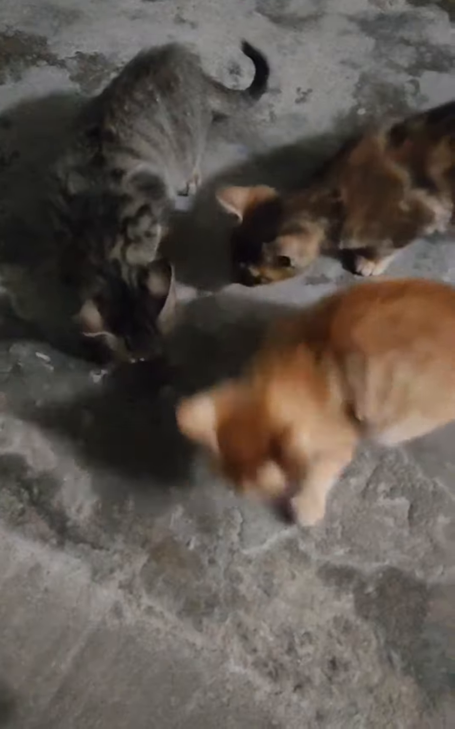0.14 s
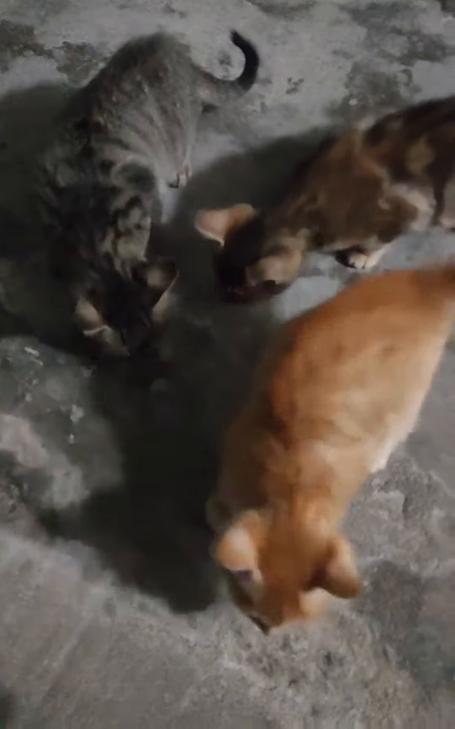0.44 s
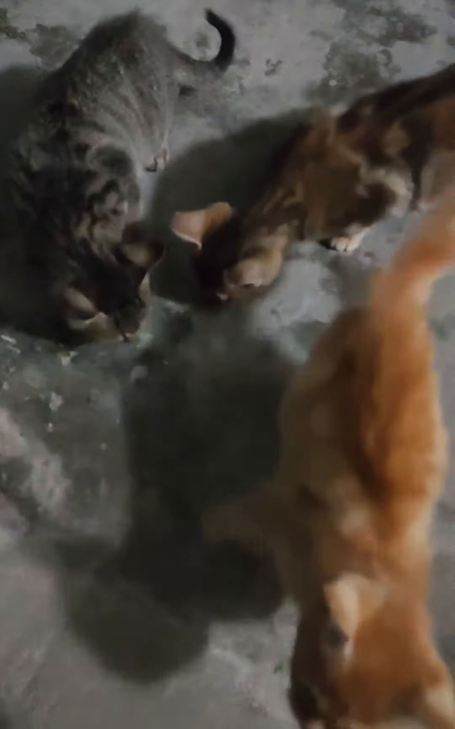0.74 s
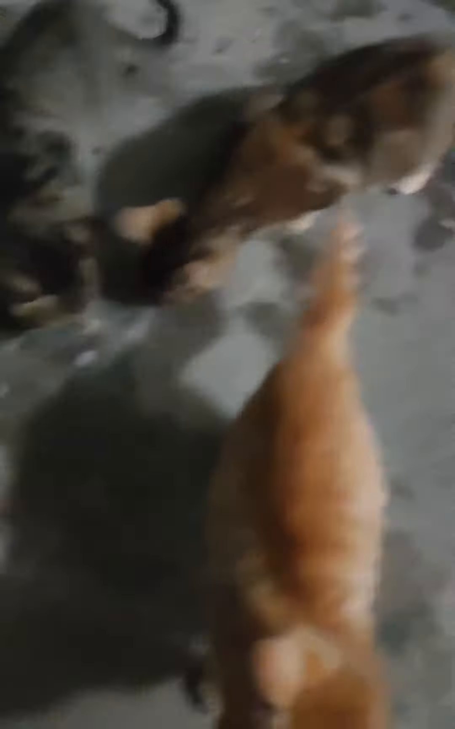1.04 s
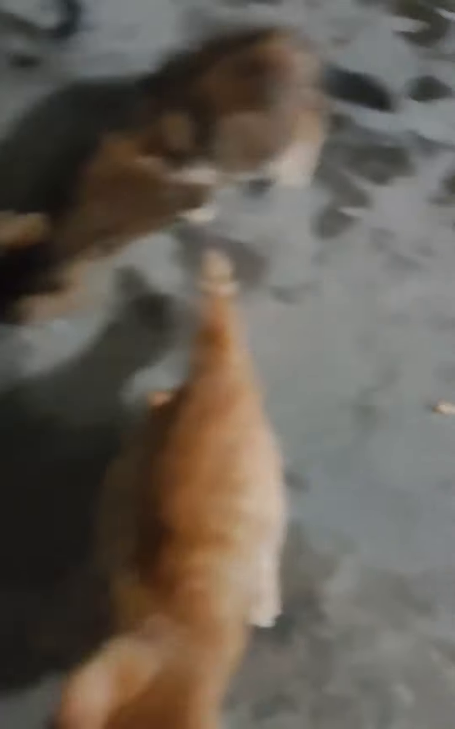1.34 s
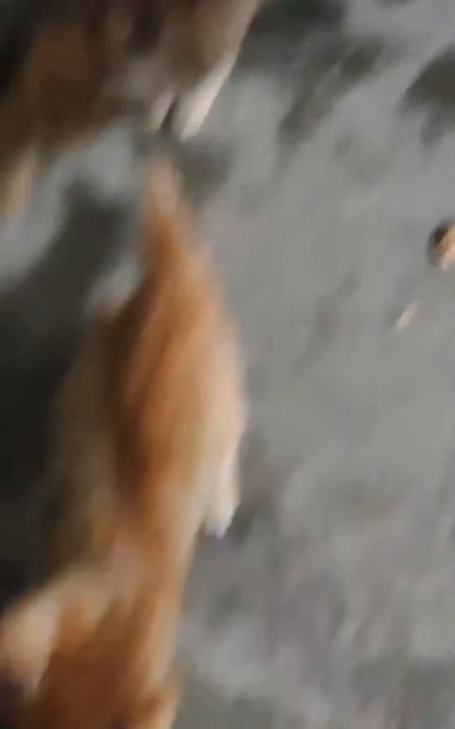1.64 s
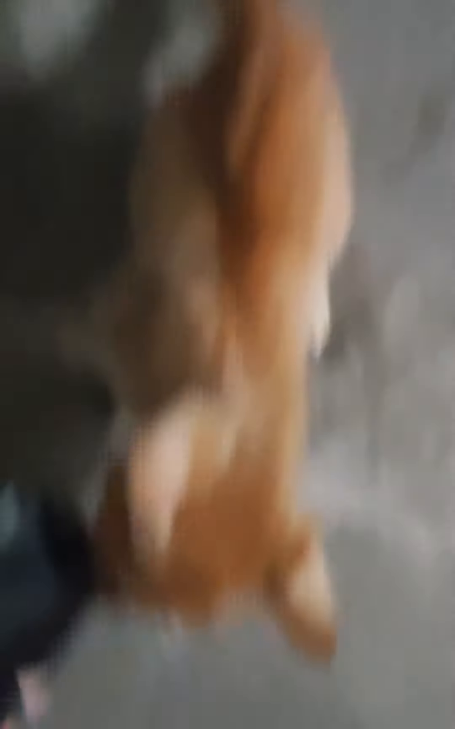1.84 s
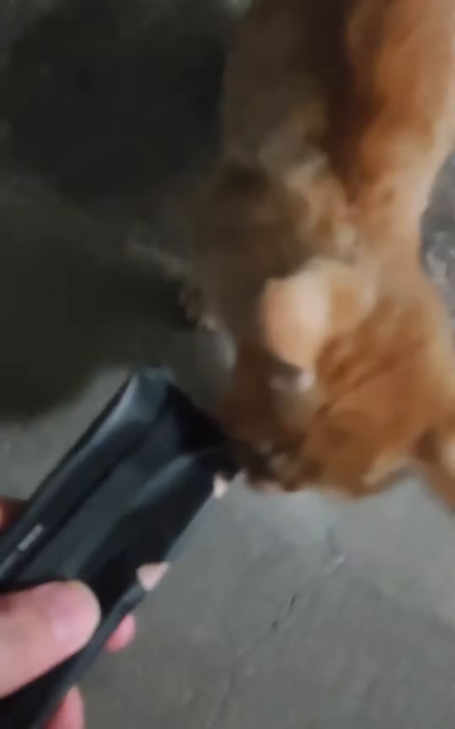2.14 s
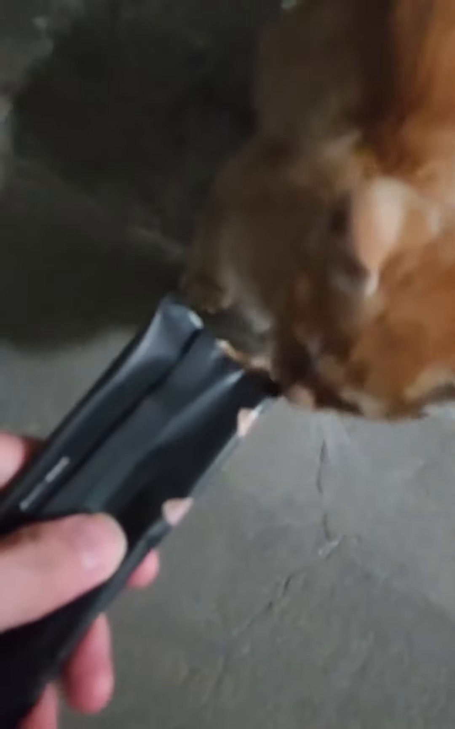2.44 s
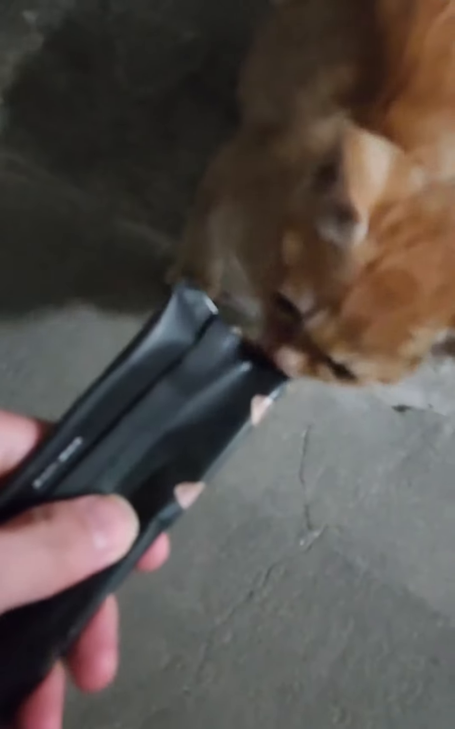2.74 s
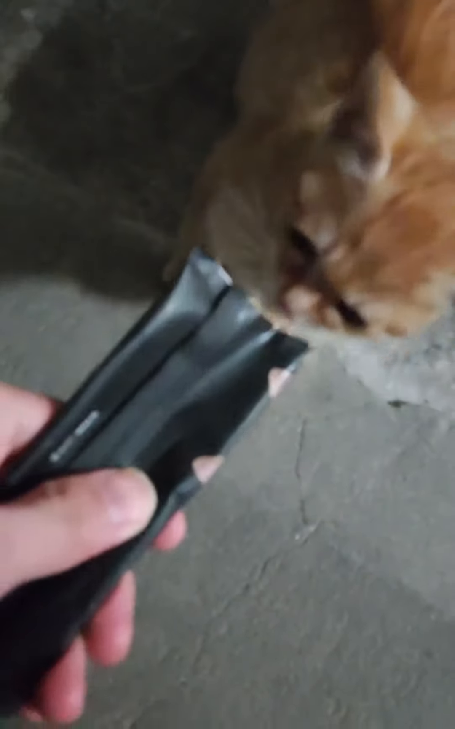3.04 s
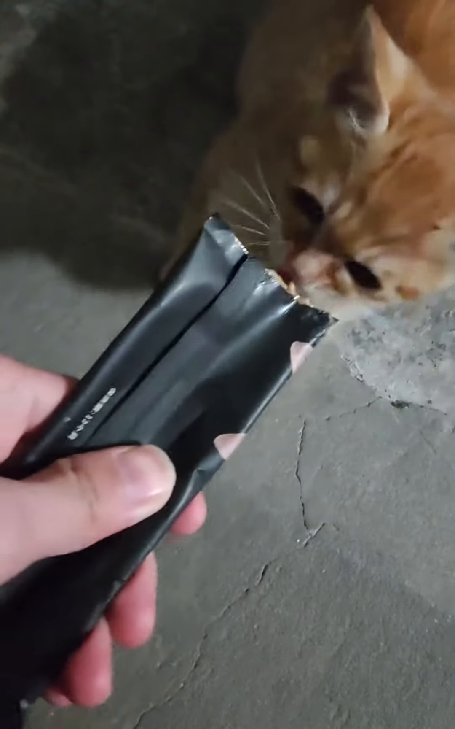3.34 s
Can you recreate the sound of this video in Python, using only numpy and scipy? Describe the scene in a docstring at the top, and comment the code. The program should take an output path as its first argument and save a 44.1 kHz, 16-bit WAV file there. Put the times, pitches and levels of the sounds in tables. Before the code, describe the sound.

A cat growls over food, a falling yowl turning rough, then a second low growl

```python
"""Cat growling over food

A cat guards its food on a concrete yard, close to a hand-held microphone: a clear yowl sinks into a growl
while its jaw chews, and after a pause comes a second, rough growl. The voice is a sum of harmonics with
pulsed air noise; a plastic pouch ticks and rustles in short noise bursts. Low noise and damped swings make
the rumble of the moving microphone, over a quiet night of coloured noise."""
import sys
import numpy as np
from scipy import signal
from scipy.fft import rfft, irfft
from scipy.io import wavfile
from scipy.ndimage import uniform_filter1d

SR = 44100
rng = np.random.default_rng(int(sys.argv[2]) if len(sys.argv) > 2 else 0)


def master(y):
    """Save y as 16-bit WAV."""
    cut = np.clip(np.atleast_2d(y).T, -1, 1)
    pcm = np.round(cut * 32767)  # scale
    wavfile.write(sys.argv[1], SR, pcm.astype(np.int16))


N = 154350
T = np.arange(N) / SR


def undb(db):
    """Decibels to gain."""
    return 10 ** (np.asarray(db) / 20)


def unit(x):
    """Scale to rms 1."""
    return x / np.sqrt(np.mean(x ** 2))


def curves(rows):
    """Each column of a table after the first, joined by straight lines in time."""
    rows = np.array(rows, float).T
    return [np.interp(T, rows[0], column) for column in rows[1:]]


def db_at(points, hz):
    """Read a spectrum on a log-frequency axis."""
    f, db = np.array(points, float).T
    return np.interp(np.log(hz + 1), np.log(f), db)


def colour(x, points, share=1):
    """Filter by a spectrum of (f/Hz, level/dB) points, its dB scaled by share."""
    db = share * db_at(points, np.fft.rfftfreq(N, 1 / SR))
    return irfft(rfft(x) * undb(db), N)


def noise(points):
    """Coloured noise of rms 1."""
    return unit(colour(rng.standard_normal(N), points))


def walk(rate):
    """Smooth random drift of rms 1, with `rate` new values per second."""
    step = int(SR / rate)
    held = np.repeat(rng.standard_normal(N // step + 1), step)
    return unit(uniform_filter1d(held, step)[:N])


def pan(x, db):
    """Place a sound by its left-minus-right level in dB."""
    return x * undb(np.array([[db], [-db]]) / 2)


# chews, each opening the mouth: t/s, half length/s, opening (0-1)
CHEW_TIMES = [(0.138,0.039,0.73),(0.357,0.057,0.81),(0.61,0.073,0.67),(0.884,0.035,0.7),(1.112,0.042,0.77),(2.266,0.027,0.5),(2.531,0.027,0.42),(2.778,0.031,0.35),(3.08,0.031,0.24),(3.401,0.064,0.35)]
# what a fully open mouth adds: f/Hz, level/dB
OPEN_MOUTH = [(330,2),(660,-7),(950,14),(1280,8),(1620,22),(2000,19),(2500,20),(3200,23),(4500,0)]
# colour of the air that rasps in the voice: f/Hz, level/dB
RASP_COLOUR = [(100,-15),(170,-16),(270,2),(340,3),(450,-9),(580,1.5),(750,-9.5),(950,-8.5),(1250,-19),(1750,-37),(2200,-23),(2800,-41),(4000,-36)]
# colour of the air past the open mouth: f/Hz, level/dB
MOUTH_AIR_COLOUR = [(700,-14),(1300,-7),(1700,1),(2150,-6),(2700,-11),(3300,2),(4200,-7),(8000,-27)]
MOUTH_AIR_DB = -16  # against the tone, at full roughness and opening, before the final mix scaling
WAVER, WANDER = 0.00497, .025  # rms swing of pitch (share): always, and extra per unit of roughness
TREMBLE_DB = 3  # rms swing of each harmonic
THROB_FROM = .16  # roughness above which the pulses fall into repeating groups


def voice(hz, db, rough, lift, throat, jitter, shimmer, rasp, throb, count):
    """Vocal-fold pulses and pulsed air pass the throat and the chewing mouth; when rough, pulses repeat
    in groups of `count`, which adds lines between the harmonics."""
    mouth = sum(size * np.exp(-np.abs((T - at) / half) ** 3) for at, half, size in CHEW_TIMES)
    swing = WAVER * walk(60) + WANDER * rough * walk(70)
    cycles = np.cumsum(hz * (1 + swing)) / SR
    # one random timing and one random size per cycle
    early, size = (np.interp(cycles, np.arange(1000), row) for row in rng.standard_normal((2, 1000)))
    phase = 2 * np.pi * (cycles + jitter * rough * early)

    folds = 0
    for k in np.arange(1, 17):
        gain = undb(mouth * db_at(OPEN_MOUTH, k * hz) + lift * (k == 1) + TREMBLE_DB * walk(30))
        folds = folds + gain * np.cos(k * phase + np.sqrt(k) * np.pi)

    split = throb * np.sqrt(np.maximum(rough - THROB_FROM, 0))
    between = [n / count for n in range(count + 1, 7 * count) if n % count]
    for k in between:
        gain = split * undb(mouth * db_at(OPEN_MOUTH, k * hz))
        drift = 2 * np.pi * rng.random() + .8 * walk(14)
        folds = folds + gain * np.cos(k * phase + drift)

    tone = colour(folds * (1 + shimmer * rough * size), throat)
    tone = tone / np.sqrt(uniform_filter1d(tone ** 2, size=1100) + 1e-12)  # even level over 25 ms
    air = noise(RASP_COLOUR)
    air = (air + mouth * (colour(air, OPEN_MOUTH) - air)) * rasp * rough
    air = air + undb(MOUTH_AIR_DB) * mouth * rough * noise(MOUTH_AIR_COLOUR)
    pulsed_air = air * (1 + .6 * np.cos(phase))
    return undb(db) * (tone + pulsed_air) / np.sqrt(1 + (rasp * rough) ** 2)


# the cat moves round the microphone, lead of the left port: t/s, lead/ms
LEFT_LEAD = [(0,0.088),(.75,0.068),(1.05,0.17),(2.3,0.52),(3.5,0.5)]
YARD_T60_S, YARD_DB = 1, -11  # decay rate of the scatter (cut off at 0.5 s) and its level


def yard(x, side):
    """The voice reaches the two ports, followed by a short scatter from ground and walls."""
    left, right = colour(x, side, 1 / 2), colour(x, side, -1 / 2)
    ahead = np.interp(T + curves(LEFT_LEAD)[0] / 1000, T, left)
    direct = np.array([ahead, right])
    tail = rng.standard_normal((2, SR // 2)) * undb(-60 * T[:SR // 2] / YARD_T60_S)
    tail /= np.sqrt(np.sum(tail ** 2, axis=1, keepdims=True))
    return direct + undb(YARD_DB) * signal.fftconvolve(direct, tail, axes=1)[:, :N]


# melody of the yowl: t/s, f/Hz, level/dB
YOWL_LINE = [(0,335.4,-42.5),(.055,397.3,-46),(.085,391.1,-43.5),(.125,348.4,-46.5),(.2,350.2,-42.5),(.235,336.7,-42.5),(.275,351.3,-40.5),(.345,316.1,-43),(.44,337.1,-40),(.52,329.9,-41.5),(.55,305.1,-44.5),(.62,291,-42),(.72,277.4,-41.5),(.78,286.8,-41),(.83,245.9,-43.5),(.88,196.6,-44),(.94,179.3,-46),(1.04,197.2,-48),(1.105,158.7,-48),(1.2,168.2,-49),(1.235,167.6,-62),(1.3,165,-79)]
# its hoarseness: t/s, roughness (0 = clear)
YOWL_HOARSE = [(0,0.17),(.78,0.11),(.87,0.22),(.95,0.47),(1.04,0.31),(1.12,0.33),(1.22,0.87)]
# throat behind the nearly shut mouth: f/Hz, level/dB
YOWL_TRACT = [(100,-33),(185,2.5),(250,5.5),(330,2),(450,-9),(560,1),(680,3.5),(830,-5),(1000,-7.5),(1170,-21.5),(1600,-27),(2400,-40.5),(4000,-39)]
# low resonance the throat gains as the yowl sinks into a growl: f/Hz, level/dB
CHEST_TONE = [(200,-8),(290,7),(370,5),(470,3),(600,-10),(1200,-40)]
# stereo colour of the yowl: f/Hz, left-minus-right level/dB
YOWL_STEREO = [(200,0.5),(340,-4.5),(600,3.5),(1000,5),(1600,-3.5),(3000,-1.5)]


def yowl():
    """A clear falling cry that brightens with each chew and gains a chest resonance as its pitch sinks."""
    hz, db = curves(YOWL_LINE)
    rough = curves(YOWL_HOARSE)[0]
    cry = voice(hz, db, rough, 0, YOWL_TRACT, jitter=.07, shimmer=.65, rasp=.5, throb=.85, count=2)
    sunk = np.clip((250 - hz) / 50, 0, 1)  # 0 above 250 Hz, 1 below 200 Hz
    cry = cry + sunk * (colour(cry, CHEST_TONE) - cry / 4) / 2
    return yard(cry * (T < YOWL_LINE[-1][0]), YOWL_STEREO)


# the growl: t/s, f/Hz, level/dB, roughness (0 = clear), lift of the fundamental/dB
GROWL_LINE = [(2.17,165.4,-79,0.77,0),(2.24,169.7,-50.5,0.56,13.5),(2.34,170.7,-44.5,1.11,-9.5),(2.44,164.9,-44.5,0.88,2),(2.52,176.7,-45.5,0.55,-4.5),(2.6,176.1,-41,0.88,-2.5),(2.66,155.8,-44,0.58,-5),(2.74,170.3,-44,0.88,-2),(2.8,176.1,-42,0.44,3),(2.85,177.4,-40,0.38,-2),(2.9,175.2,-44.5,0.67,-7),(3.02,171.3,-44,.55,5),(3.13,183.8,-40,0.6,4),(3.19,178.8,-42.5,0.71,0),(3.225,170.2,-41,0.25,-1),(3.275,182.2,-43.5,0.42,1),(3.31,179,-39,0.19,-1),(3.37,171.9,-41,0.26,3.5),(3.455,169,-40.5,0.13,10.5),(3.485,172,-58,0.4,-1)]
# throat behind the nearly shut mouth: f/Hz, level/dB
GROWL_TRACT = [(110,-27),(170,1.5),(250,9),(350,5),(450,-2),(520,-7.5),(600,7),(720,-2.5),(800,1),(900,-9),(1030,-14.5),(1250,-20.5),(1700,-54),(2200,-51),(2800,-65)]
# stereo colour of the growl: f/Hz, left-minus-right level/dB
GROWL_STEREO = [(170,-0.5),(350,-7),(540,14),(720,-10),(950,12),(1400,-3.5),(2200,1)]


def growl():
    """A growl through a nearly shut mouth: roughness jitters and splits the pulses, less so at the end."""
    hz, db, rough, lift = curves(GROWL_LINE)
    cry = voice(hz, db, rough, lift, GROWL_TRACT, jitter=.05, shimmer=.35, rasp=.35, throb=.64, count=3)
    return yard(cry * (T > GROWL_LINE[0][0]), GROWL_STEREO)


# ticks of the pouch and teeth: t/s, level/dB, f/Hz, left-minus-right level/dB, decay/s, width/octaves
TICK_LIST = [(.589,-52,8950,-2,0.0044,0.86),(1.792,-51.5,6100,-6,0.0056,0.72),(1.848,-55.5,5430,-8,.004,.8),(1.922,-53,2500,-8,.004,.5),(1.9928,-46.5,2700,-7,0.002,1),(2.0145,-38,2080,-2,0.0013,0.66),(2.0398,-46.5,5700,2,0.0091,0.21),(2.041,-50,3000,-1,0.0095,0.74),(2.1102,-48,3240,0,.0024,0.27),(2.2257,-51.5,3400,-7,0.0032,0.3),(2.2485,-55.5,3720,-2,0.032,0.11),(2.281,-48.5,4200,4,.002,0.79),(2.599,-54.5,6220,-3,0.011,0.16),(2.736,-46,3890,0,0.003,0.88),(2.787,-48.5,4760,-2,.003,0.6),(2.846,-52,3650,0,0.0036,0.22),(2.8785,-41,6560,9,0.0017,0.16),(2.9327,-49,14000,0,.0008,.3),(3.212,-49,9300,9,0.0024,.2),(3.251,-51,7980,9,.002,0.45),(3.3482,-52,2300,1,0.014,0.2),(3.416,-44.5,9900,2,.0014,0.96),(3.44,-51.5,4200,-4,0.0039,.22)]
TICK_BODY_DB, TICK_ATTACK_S = -16, 0.0003  # broad noise under each tick's band, and its onset
CRINKLE_PER_S, CRINKLE_DB = 14, -78  # average rate and overall level of the faint crinkles


def pouch():
    """Plastic creases snap as short band-shaped noise bursts, with faint random crinkles throughout."""
    out, count = np.zeros((2, N)), 4096
    f, age = np.fft.rfftfreq(count, 1 / SR) + 1, T[:count]
    for at, db, hz, side, decay, width in TICK_LIST:
        band = np.exp(-.5 * (np.log2(f / hz) / width) ** 2)
        body = undb(TICK_BODY_DB) * f / (f + 1000) / (1 + f / 9000)
        shared, *own = irfft(rfft(rng.standard_normal((3, count))) * (band + body))
        envelope = (1 - np.exp(-age / TICK_ATTACK_S)) * np.exp(-age / decay)
        burst = unit(shared + 2.1 * np.array(own)) * envelope * undb(db) / 2
        start = int(at * SR)
        out[:, start:start + count] += pan(burst, side)[:, :N - start]
    snaps = (rng.random(N) < CRINKLE_PER_S / SR) * rng.random(N)
    ring = rng.standard_normal((2, count)) * np.exp(-age / 0.0072)
    crinkles = signal.fftconvolve(snaps[None], ring, axes=1)[:, :N]
    return out + undb(CRINKLE_DB) * unit(colour(crinkles, HISS_COLOUR))


# microphone rumble before panning: t/s, level/dB
RUMBLE_LINE = [(0,-40),(.2,-39.5),(.35,-40),(.62,-39.5),(.85,-42),(1.18,-47.5),(1.3,-49.5),(1.6,-66),(1.8,-47),(1.87,-53),(2.0,-48.5),(2.15,-52),(2.3,-64),(2.47,-56),(2.56,-47),(2.66,-63),(3.0,-63),(3.39,-70),(3.44,-54),(3.5,-58)]
# its colour: f/Hz, level/dB
RUMBLE_COLOUR = [(15,-3.5),(45,3),(110,-1),(160,-3),(230,-17.5),(310,-20.5),(400,-27.5),(900,-56.5)]
# soft bumps of handling and steps: t/s, level/dB, f/Hz, left-minus-right level/dB
BUMP_LIST = [(0.11,-46,154,18),(0.178,-28,50.3,7),(0.218,-32,147,15),(0.421,-31.5,121,17),(.587,-33.5,105,-26.5),(0.616,-40.5,144,-29),(0.736,-39.5,95.7,31.5),(0.842,-41,89.62,19),(1.172,-42.5,38.9,32),(1.321,-43.5,128,-7),(1.675,-47,69,-22),(1.776,-43,79,-25.5),(1.817,-39,120,-19.5),(1.906,-41.5,73.6,10),(1.937,-44.5,86,26.5),(2.035,-42.5,65,30.5)]
BUMP_S = 0.0036  # time for a bump's envelope to peak


def handling():
    """Air and the hand rumble on each port as low noise; bumps push a heavily damped swing."""
    level = undb(curves(RUMBLE_LINE)[0] + 2 * walk(21.12))
    out = pan(np.array([noise(RUMBLE_COLOUR), noise(RUMBLE_COLOUR)]) * level, 4.6)
    for at, db, hz, side in BUMP_LIST:
        age = np.maximum(T - at, 0)
        envelope = age / BUMP_S * np.exp(1 - age / BUMP_S)
        out = out + pan(undb(db) * envelope * np.sin(2 * np.pi * hz * age), side)
    return out


# colour of the night background: f/Hz, level/dB per Hz
NIGHT_COLOUR = [(30,6.5),(160,4),(300,-0.5),(450,-12.5),(900,-24.5),(1300,-41.5),(2100,-25.5),(2800,-32),(4500,-28.5),(6300,-31.5),(7400,-35),(16000,-37.5)]
# colour of the fine hiss, also of the crinkles: f/Hz, level/dB per Hz
HISS_COLOUR = [(800,15.5),(2200,10),(3500,4),(5000,1.5),(6400,6.5),(7600,-12.5),(10000,-7.5),(15000,-2)]
# fine hiss, before its stereo spread is added: t/s, level/dB
HISS_LINE = [(0,-75),(.35,-63.5),(1.25,-60.5),(1.55,-69.5),(1.85,-66.5),(2.15,-69.5),(2.5,-64),(2.8,-67),(3.0,-67.5),(3.5,-67.5)]
# colour of the topmost hiss: f/Hz, level/dB
TOP_HISS_COLOUR = [(6000,-12),(9000,-7),(12000,-4.5),(15000,-2)]
# topmost hiss: t/s, level/dB
TOP_HISS_LINE = [(0,-75),(.35,-77),(.7,-77),(1.25,-70),(1.55,-81.5),(2.15,-76),(2.45,-73),(2.8,-71),(3.0,-73.5),(3.5,-74)]
NIGHT_DB, NIGHT_LIKENESS = -54.5, 0.69  # middle level; share of power common to both sides


def night():
    """A dull distant noise, partly shared by both sides, and a fine hiss that swells and sinks."""
    shared = noise(NIGHT_COLOUR)
    own = np.array([noise(NIGHT_COLOUR), noise(NIGHT_COLOUR)])
    far = np.sqrt(NIGHT_LIKENESS) * shared + np.sqrt(1 - NIGHT_LIKENESS) * own
    far = far * undb(NIGHT_DB + 3.3 * walk(6.9))
    spread = colour(noise(HISS_COLOUR), [(6500, 0), (11000, -23)])  # widens all but the top
    hiss = noise(HISS_COLOUR) + np.array([spread, -spread])
    top = noise(TOP_HISS_COLOUR) * undb(curves(TOP_HISS_LINE)[0])
    return far + hiss * undb(curves(HISS_LINE)[0]) + top


def scene():
    """The cat, the pouch, the hand and the night."""
    return yowl() + growl() + pouch() + handling() + night()


TOP_HZ = 15800  # upper edge of the recorder's band


def record(dry):
    """The recorder drops the deepest rumble with a gentle high-pass and cuts the top steeply."""
    dry = signal.sosfilt(signal.butter(1, 12, "high", fs=SR, output="sos"), dry)
    return signal.sosfilt(signal.ellip(10, .2, 70, TOP_HZ, fs=SR, output="sos"), dry)


dry = scene()
out = record(dry)
master(out)
```